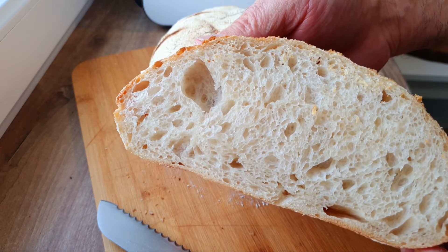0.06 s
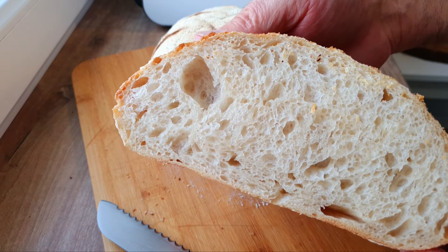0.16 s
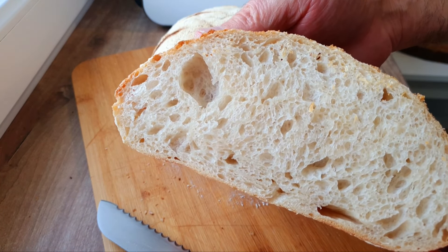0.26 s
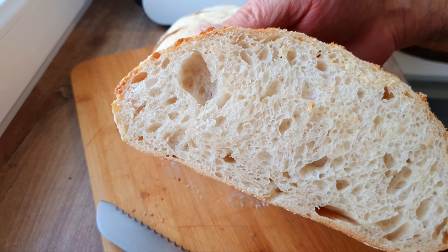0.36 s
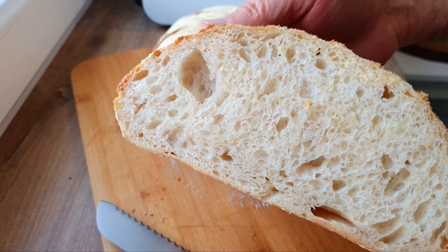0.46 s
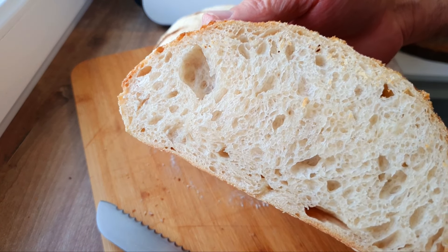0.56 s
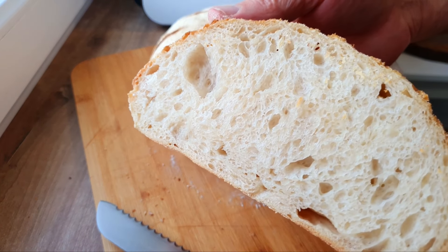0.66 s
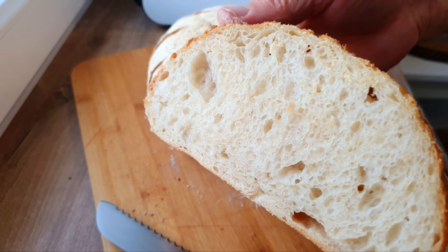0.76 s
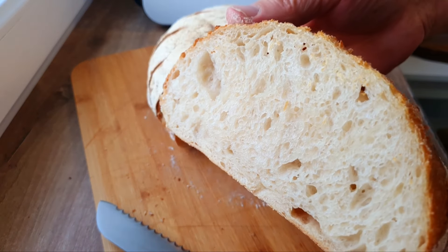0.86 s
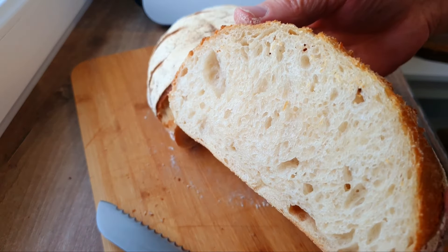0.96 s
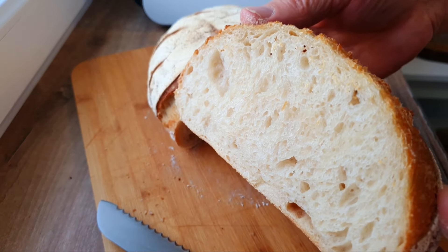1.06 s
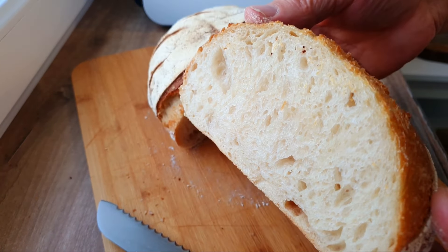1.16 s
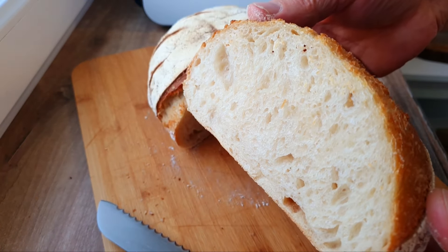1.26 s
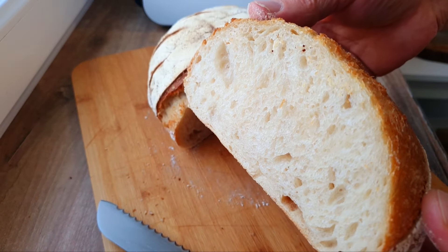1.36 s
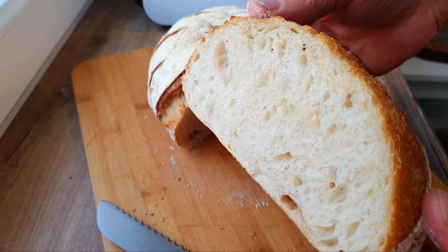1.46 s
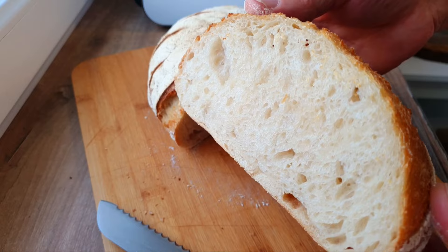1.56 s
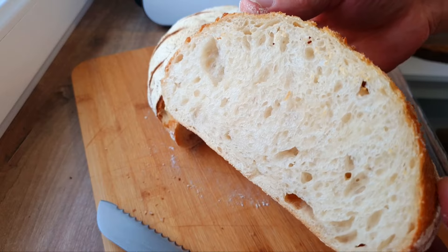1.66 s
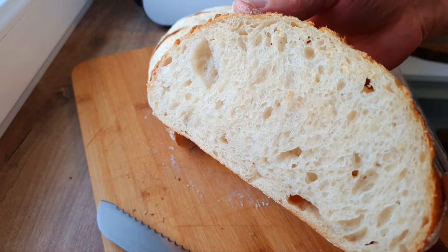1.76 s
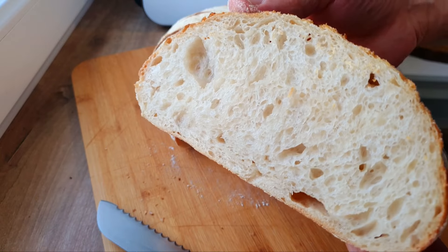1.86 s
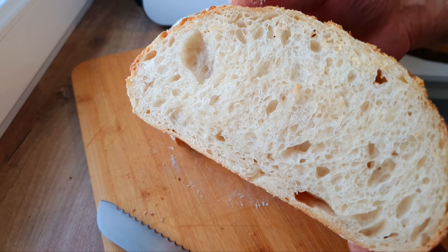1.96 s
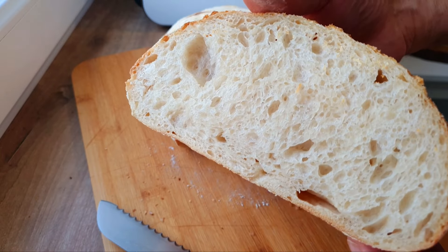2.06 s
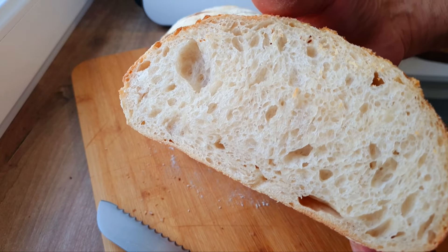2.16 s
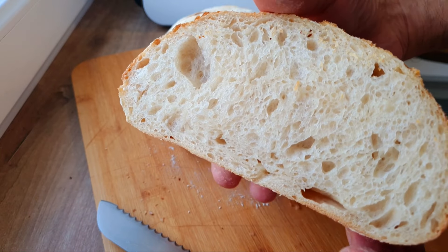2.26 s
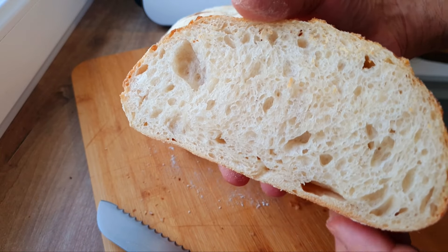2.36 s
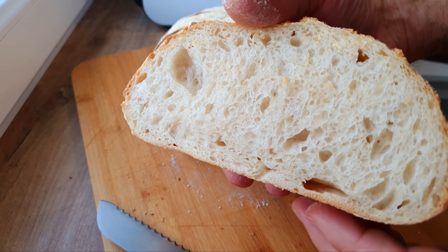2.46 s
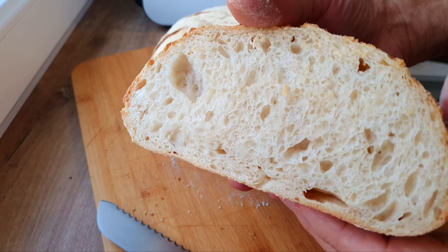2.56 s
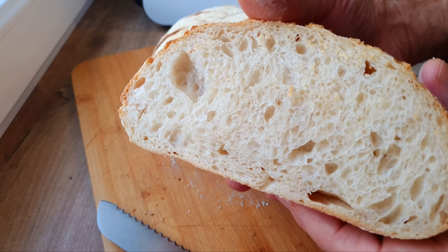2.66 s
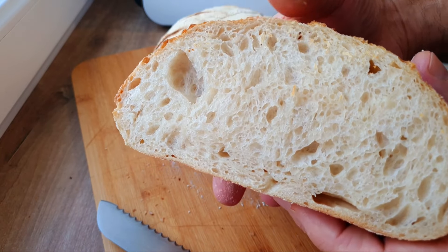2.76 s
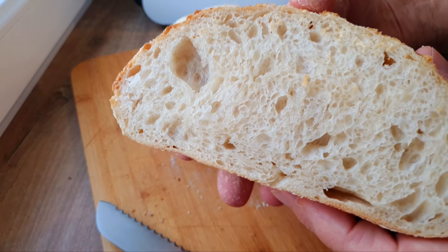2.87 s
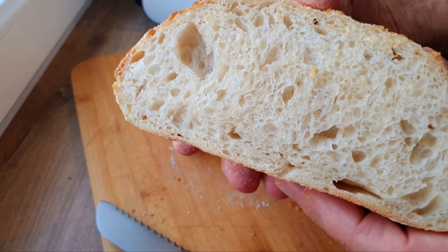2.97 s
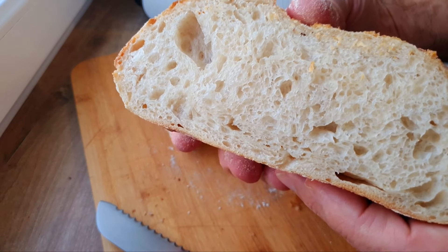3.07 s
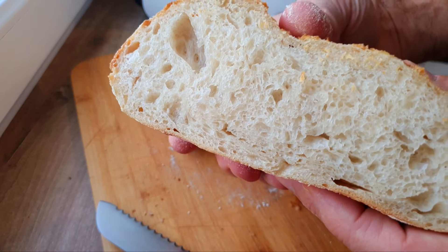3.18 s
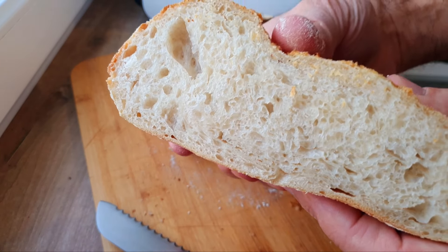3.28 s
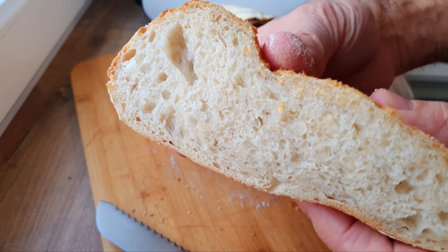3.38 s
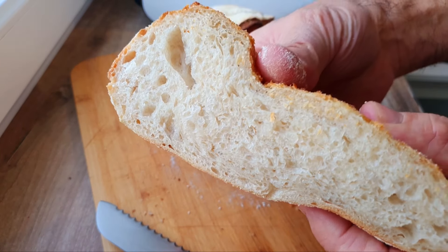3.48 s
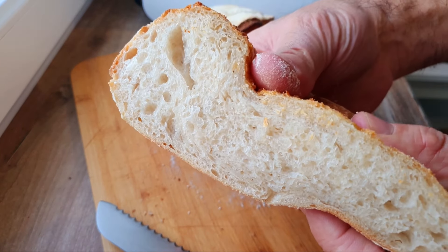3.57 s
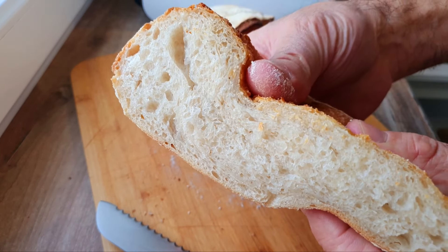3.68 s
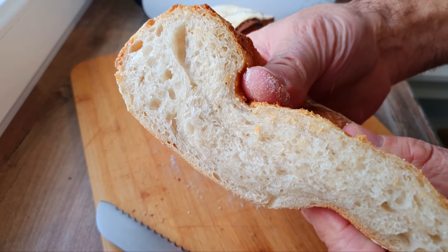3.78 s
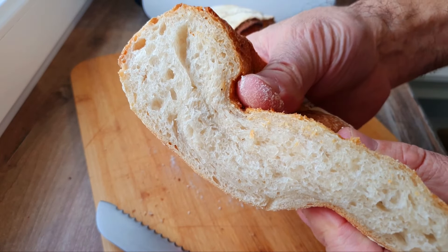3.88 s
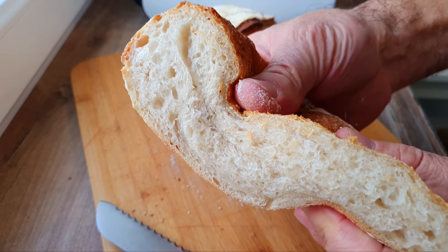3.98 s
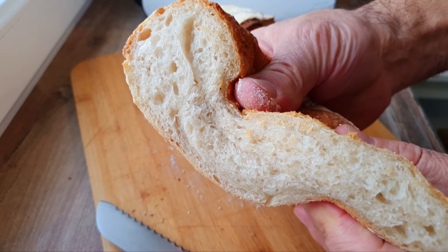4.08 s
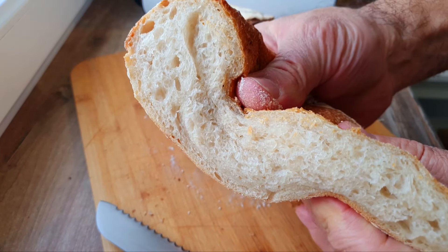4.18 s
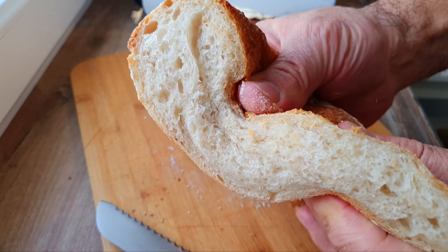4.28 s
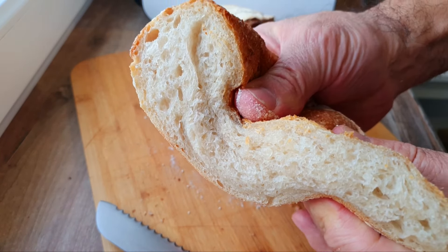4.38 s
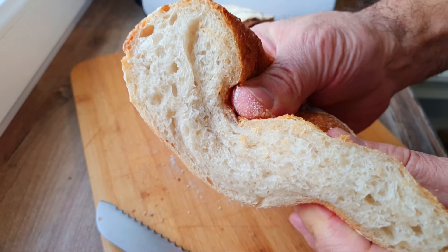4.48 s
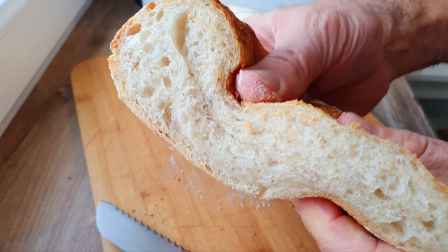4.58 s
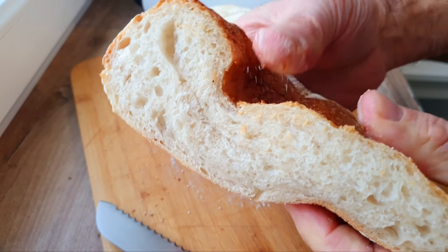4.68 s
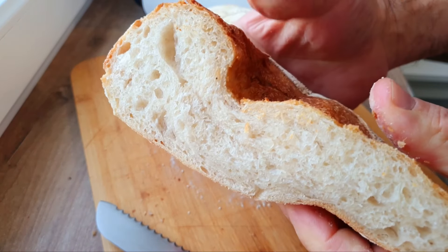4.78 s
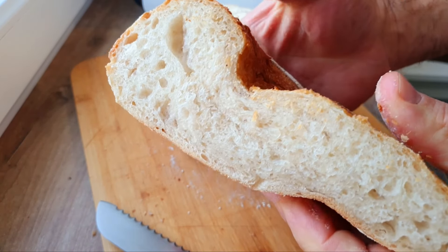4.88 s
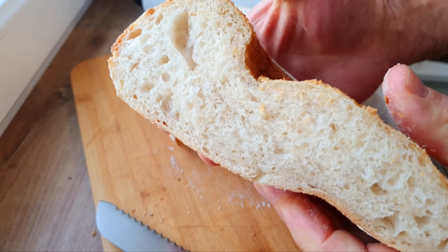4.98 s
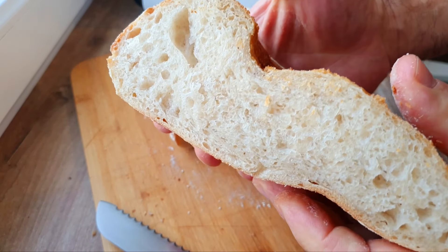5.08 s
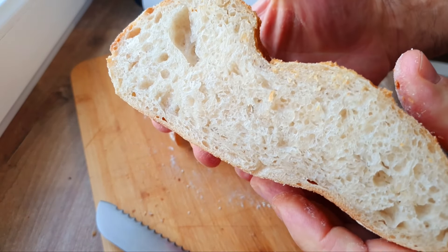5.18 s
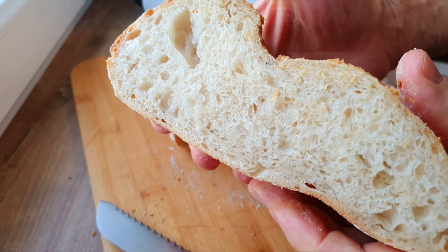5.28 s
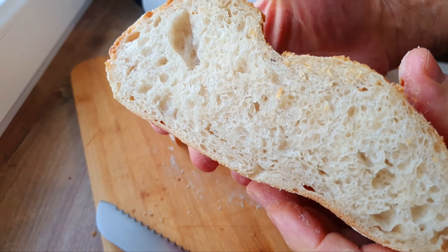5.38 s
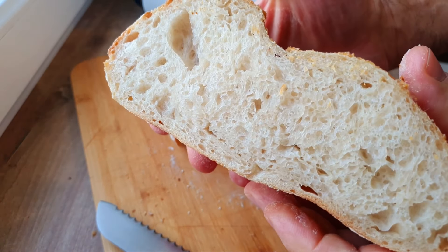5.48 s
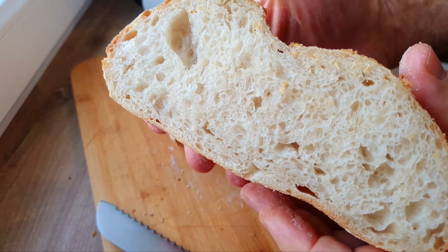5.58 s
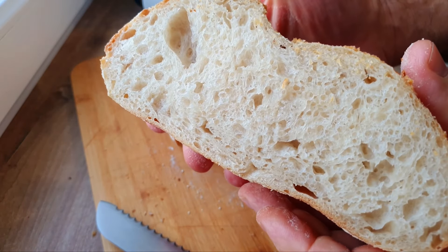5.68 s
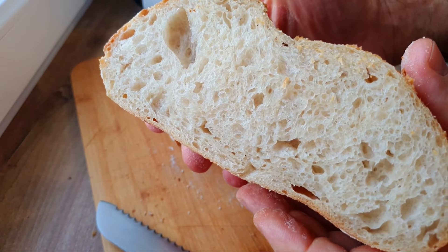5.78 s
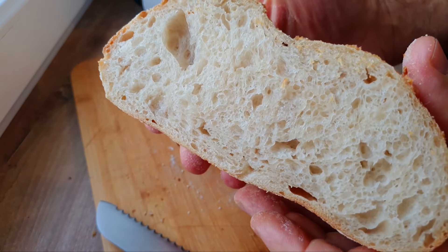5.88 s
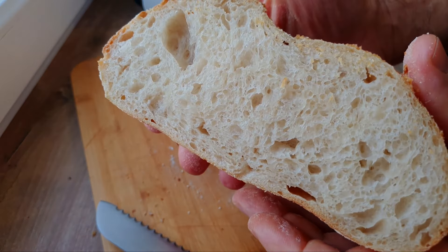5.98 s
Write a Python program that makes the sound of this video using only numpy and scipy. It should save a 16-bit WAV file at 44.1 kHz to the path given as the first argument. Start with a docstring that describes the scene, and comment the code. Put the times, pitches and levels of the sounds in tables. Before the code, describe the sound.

A small kitchen hums throughout: a deep, slightly throbbing appliance tone with faint wavering higher tones and a soft steady rush. Close to the microphone, a crusty loaf turns in the hands, almost silent apart from faint brushes at about 0.7 and 1.05 s. From 1.9 to 2.9 s fingers rub more distinctly, with dry gritty scrapes, short skin squeaks and a soft knock near 2.1 s; small cracks begin around 2.75 s. At 3.05 s the crust gives way with a sharp snap, and dense brittle crackling surges until about 4.5 s, packed with bright splintering pops, strongest around 3.05, 3.45 and 3.6 s, gradually thinning after 4.2 s. Near 4.65 s the thumb releases with a dull hollow knock and a scratchy slip. Light rubbing and scattered tiny ticks follow to about 5.1 s, then mostly hum with rare faint ticks and a last soft rustle by 6 s.

```python
"""An appliance hums and rushes in a small kitchen while fingers rub the floury crust of a cut loaf in the hands.
The loaf is bent until its crust breaks: surges of tiny fractures (shaped noise) and sharp cracks (noise bursts
with a ringing piece), a hollow knock (damped modes) as the thumb lets go, then ticks as the crust settles.
The hum is a sum of wavering tones, the rush coloured noise, the rubbing trains of bursts in skin and crust bands."""
import sys
import numpy as np
from scipy import signal
from scipy.fft import rfft, irfft, next_fast_len
from scipy.io import wavfile
from scipy.ndimage import map_coordinates

SR = 44100
rng = np.random.default_rng(int(sys.argv[2]) if len(sys.argv) > 2 else 0)


def unload_audio(sound):
    """Save the sound as a 16-bit wav file, at the path given as the first command line argument."""
    columns = np.transpose(np.atleast_2d(sound))
    # keep every value between -1 and 1, then stretch to whole-number steps
    steps = np.round(np.clip(columns, -1, 1) * 32767)
    wavfile.write(sys.argv[1], SR, steps.astype(np.int16))


N = 266083


def amp(db):
    """Logarithmic level: decibels to an amplitude gain."""
    return 10 ** (np.asarray(db) / 20)


def unit(x):
    """Power normalisation: x scaled to rms 1."""
    return x / np.sqrt(np.mean(x ** 2) + 1e-20)


def along(points, hz):
    """Logarithmic frequency scale: (f/Hz, value) points interpolated along it."""
    f, value = np.transpose(points)
    return np.interp(np.log(hz + 1), np.log(f + 1), value)


def wobble(rate):
    """Band-limited random fluctuation: a smooth curve through `rate` random knots a second."""
    position = np.arange(N) * rate / SR
    fine = np.arange(0, position[-1] + 1, .125)
    knots = rng.standard_normal(int(position[-1]) + 4)
    return np.interp(position, fine, map_coordinates(knots, [fine]))


def sides(balance_db):
    """Level-difference stereo: left and right gains of mean power 1."""
    return unit(amp([[balance_db / 2], [-balance_db / 2]]))


def filtered(x, response):
    """Linear filtering: the spectrum of x times a response of frequency."""
    n = x.shape[-1]
    padded = next_fast_len(n + n // 8)
    spectrum = rfft(x, padded) * response(np.fft.rfftfreq(padded, 1 / SR))
    return irfft(spectrum, padded)[..., :n]


def coloured(x, spectrum):
    """Spectral shaping: x filtered by (f/Hz, dB) points and brought to rms 1."""
    return unit(filtered(x, lambda hz: amp(along(spectrum, hz))))


def add(track, s, sound):
    """Superposition: a sound is mixed into the track from time s."""
    part = track[:, max(round(s * SR), 0):][:, :sound.shape[-1]]
    part += sound[..., :part.shape[-1]]


def held(s, length, attack, release, fade_db=0):
    """Exponential growth and decay: reaches 1 at time s, fades by fade_db while held, then dies away."""
    t = np.arange(N) / SR - s
    edges = np.exp(np.minimum(t, 0) / attack - np.maximum(t - length, 0) / release)
    return edges * amp(-fade_db * np.clip(t / length, 0, 1))


def decaying_power(power, life):
    """Exponential relaxation: the amplitude of kicks of power that each die away over `life` seconds."""
    return np.sqrt(signal.lfilter([1], [1, -np.exp(-2 / (life * SR))], power))


def fractures(rate, spread_db, life):
    """Shot noise: a stereo train of `rate` tiny bursts a second at random times, many small, a few large."""
    size = amp(spread_db * np.minimum(rng.exponential(size=N), np.pi))
    size = size * (rng.random(N) < rate / SR)
    return unit(decaying_power(size ** 2, life) * rng.standard_normal((2, N)))


# air noise of appliance and room: f/Hz, relative level/dB per Hz
AIR = [(20, -14), (55, 9.5), (150, 5.5), (230, -1), (400, 0), (650, 1.8), (1100, -0.9), (1450, -8),
       (2400, -12), (3550, -9), (4400, -17.5), (7600, -19.5), (9000, -31), (15500, -21.5)]
# likeness of left and right, from 0 (unrelated) to 1 (identical): f/Hz, likeness
ALIKE = [(40, 0.38), (130, 1), (260, 0.26), (600, 0), (2000, 0)]


def air(level_db=-56.0):
    """Partial coherence of diffuse noise: a steady rush, alike in both channels only in part of the bass."""
    def turn(hz):
        return np.arccos(np.clip(along(ALIKE, hz), -1, 1)) / 2

    def mid_side_gains(hz):
        return np.array([np.cos(turn(hz)), np.sin(turn(hz))])

    mid, side = filtered(rng.standard_normal((2, N)), mid_side_gains)
    return amp(level_db + 0.24 * wobble(4.37)) * coloured(np.array([mid + side, mid - side]), AIR)


def drone(level_db=-61, centre_hz=156, width_hz=11):
    """Narrow-band noise: a resonance of the running appliance swells and dips irregularly."""
    band = filtered(rng.standard_normal(N), lambda hz: 1 / (1 + (2 * (hz - centre_hz) / width_hz) ** 4))
    return amp(level_db) * sides(0.93) * unit(band)


# the appliance's steady tones in the room's standing waves:
# f/Hz, rms level/dB, left-right difference/dB, left's phase lead/rad
HUM = [(60.1, -52.5, 0, -.2), (120.2, -65, 1, 0), (240.5, -75, 2, .2), (270.7, -70, 8, -.6),
       (360.8, -61.5, -15, -2.3), (480.9, -73, -6, 3), (541.2, -75, 0, -.4), (781.8, -70, -2, -1.9),
       (800, -68.5, -10, -1.7), (1022, -70, 2, -2.6), (1082, -74, -4, 2.8), (1203, -68.5, 2, 3),
       (1623, -79, -1, -2.3), (3067, -81, -5, -.5), (3246, -84, 0, 0), (3548, -78, 3, 2.7),
       (3607, -78, 8, -2), (3790, -86, 0, 0)]


def hum(waver_db=4.0, drift=0.11, steady_hz=130):
    """Harmonic excitation: a compressor's bass tones keep in step with its strokes, higher ones waver."""
    t, out = np.arange(N) / SR, np.zeros((2, N))
    for hz, db, balance_db, lead in HUM:
        loose = np.clip((hz - steady_hz) / 400, 0, 1)
        start = (hz > steady_hz) * rng.random()  # cycles
        phase = 2 * np.pi * (hz * t + start) + drift * np.sqrt(hz / 60) * wobble(4.52)
        tone = -np.sqrt(2) * np.cos([phase + lead / 2, phase - lead / 2])
        out += amp(db + waver_db * loose * wobble(9)) * sides(balance_db) * tone
    return out


def shaking(level_db=-51.5, ebb_db_per_s=1.8):
    """Beating: an ebbing tone midway between the hum's first two harmonics makes the hum throb."""
    t = np.arange(N) / SR
    cycles = 3 / 2 * HUM[0][0] * t
    sway_db = .7 * wobble(2.5)
    return amp(level_db - ebb_db_per_s * t + sway_db) * -np.sqrt(2) * np.cos(2 * np.pi * cycles)


# faint rustle of the loaf lying in the hands: t/s, nominal level/dB
HOLDING = [(0, -79), (.8, -66.5), (1.65, -87), (2.15, -62), (4.7, -60), (5.0, -55.5), (5.3, -60),
           (6.03, -65)]
# strokes of the fingers over the crust: t/s, length/s, nominal rasp level/dB, skin re rasp/dB
RUBS = [(0.737, 0.12, -61.5, -3), (1.046, 0.023, -68.5, 7), (1.871, 0.024, -61, 0),
        (2.065, 0.042, -48, -4.5), (2.332, 0.012, -49, -2.5), (2.393, 0.028, -51.5, -8),
        (2.573, 0.023, -57, -22), (2.675, 0.095, -48.5, -9.5), (2.961, 0.17, -53, 0.5),
        (4.486, 0.28, -55, -5), (4.75, 0.008, -64, -20), (4.81, .015, -59, -17), (4.87, 0.086, -50, -14),
        (5.687, 0.025, -69, 3)]
RUB_ATTACK_S, RUB_RELEASE_S = 0.013, 0.038
# spectrum of rough crust: f/Hz, relative level/dB
RASP = [(300, 5), (1500, -15), (2600, -8.5), (4500, -0.5), (7500, 3), (9000, -7.5), (12000, -3.5),
        (15500, -2)]
# spectrum of dragging skin: f/Hz, relative level/dB
SKIN = [(150, 1), (400, 4), (1100, 5), (1650, 2), (2200, 2), (3500, 2), (8000, -10.5)]


def fingers(rasp_db=-5.0, skin_db=-2, holding_skin_db=1, catch_db=-8, grip_db=-54):
    """Dry friction: skin drags over flour and rough crust in strokes and a faint rustle, catching on crumbs."""
    holding = amp(np.interp(np.arange(N) / SR, *np.transpose(HOLDING)) + 0.89 * wobble(7.3))
    rasp, skin = holding, amp(holding_skin_db) * holding
    for s, length, db, soft_db in RUBS:
        stroke = amp(db) * held(s, length, RUB_ATTACK_S, RUB_RELEASE_S)
        rasp, skin = np.hypot(rasp, stroke), np.hypot(skin, amp(soft_db) * stroke)
    grit = fractures(rate=2500, spread_db=3.5, life=.0006)
    catches = fractures(rate=140, spread_db=3, life=.0007)
    drag = fractures(rate=3200, spread_db=0.0, life=0.0016)
    grip = rasp / (rasp + amp(grip_db))  # a light touch glides with little catching
    rough = amp(rasp_db) * coloured(grit, RASP) + amp(catch_db) * grip * coloured(catches, RASP)
    soft = amp(skin_db) * skin * coloured(drag, SKIN)
    judder = unit(amp(2.6 * wobble(170)))
    return sides(-0.79) * judder * (rasp * rough + soft)


# skin slipping on the crust, each slip with its own pitch: t/s, level/dB, f/Hz, half length/s
SLIPS = [(0.653, -63, 2450, 0.011), (1.059, -64.5, 1590, 0.012), (1.993, -59, 1460, 0.016),
         (2.084, -47.5, 1670, 0.015), (2.07, -57, 2300, 0.013), (2.135, -58, 1600, .018),
         (2.697, -53.5, 4600, 0.014), (2.695, -57.5, 3700, 0.016), (2.764, -52.5, 2850, 0.011),
         (2.985, -56.5, 2450, .008), (3.042, -50, 1650, .005), (4.599, -48, 4170, 0.018),
         (4.66, -50, 3250, 0.025)]


def slips(width=0.21):
    """Stick-slip: a fingertip briefly sounds one resonance of the crust, of the given relative width."""
    out, t = np.zeros((2, N)), np.arange(-SR // 16, SR // 16) / SR
    for s, db, centre, half in SLIPS:
        noise = rng.standard_normal((2, len(t)))
        ring = filtered(noise, lambda hz: 1 / (1 + ((hz / centre - 1) * 2 / width) ** 2))
        judder = amp(4 * wobble(220)[:len(t)])
        add(out, s + t[0], amp(db) * np.exp(-(t / half) ** 2 / 2) * unit(judder * ring))
    return out


# soft knocks of the hands on the loaf: t/s, nominal level/dB
KNOCKS = [(2.075, -49), (3.044, -53), (3.457, -52), (3.591, -44.5), (4.635, -42.5), (4.651, -42),
          (4.663, -39.5)]
# the loaf's hollow ring: f/Hz, relative level/dB, t60/s
LOAF = [(294, 3.5, 0.094), (377, 3.5, 0.074), (497, 2.5, 0.046), (850, -2, 0.072), (1100, 8, 0.039),
        (1350, 7, 0.031), (1520, 1, 0.04), (1730, -2, 0.06)]
# the dull push of the soft crumb: f/Hz, relative level/dB per Hz
CRUMB = [(120, -24), (280, -4), (450, -5), (800, 15), (1300, -14), (2500, -41)]


def knocks(attack=0.00058, crumb_t60=0.046, ring_db=-3):
    """Damped modes: the crumb gives a dull thud and the loaf's hollow shell rings briefly."""
    out, t = np.zeros((2, N)), np.arange(SR // 4) / SR
    for s, level_db in KNOCKS:
        ring = np.zeros((2, len(t)))
        for hz, db, t60 in LOAF:
            ring += amp(db - 60 * t / t60) * np.sin(2 * np.pi * (hz * t + rng.random((2, 1))))
        thud = amp(-60 * t / crumb_t60) * coloured(rng.standard_normal((2, len(t))), CRUMB)
        add(out, s, amp(level_db) * (1 - np.exp(-t / attack)) * (amp(ring_db) * ring + thud))
    return out


# stretches in which the crust gives way, long under the thumb's two steady pushes, short in surges:
# t/s, rise/s, length/s, nominal level/dB, fade over the length/dB, flexing re level/dB
SURGES = [(3.054, .002, 1.014, -42, 1, -7.5), (3.047, 0.0055, 0.08, -30, 5.5, -6.5),
          (3.149, .002, 0.024, -35.5, 0, -5), (3.188, 0.0046, 0.097, -33, -1.5, -6),
          (3.312, 0.0089, 0.082, -34, 5.5, -2), (3.444, 0.013, 0.087, -33.5, 2, -5.5),
          (3.585, .012, 0.06, -37, -2, -19), (3.725, .01, 0.081, -44.5, 3, -5.5),
          (3.802, .002, 0.052, -31.5, 1.5, -6), (3.875, .003, .075, -33.5, 1.5, -5.5),
          (3.993, 0.0094, 0.081, -36, -2, -7), (4.08, .002, 0.061, -43, 0, -16),
          (4.124, .004, 0.33, -41.5, 1, -10.5), (4.166, .002, 0.065, -34, -3.5, -10.5),
          (4.278, .006, 0.16, -37, 2.5, -8.5), (4.499, .009, 0.047, -41, 0.5, -11),
          (4.594, 0.018, 0.04, -42, 1, -1), (4.642, .01, 0.034, -40, 11, 4)]
SURGE_RELEASE_S = 0.0073


def bending():
    """Incoherent power addition: levels of fine crackle and flexing shell, summed over the surges."""
    fine, flex = 0, 0
    for s, rise, length, db, fade_db, flex_db in SURGES:
        surge = amp(db) * held(s, length, rise, SURGE_RELEASE_S, fade_db)
        fine = fine + surge ** 2
        flex = flex + (amp(flex_db) * surge) ** 2
    return np.sqrt(fine), np.sqrt(flex)


def chips(centre_hz=5400, octaves=0.63, ring_cycles=13, count=2000, size=400):
    """Impulse response of small flakes: each a sharp tick and brief ring of its own pitch, strength and side."""
    out, t = np.zeros((2, N)), np.arange(size) / SR
    when, strength, pitch, side = rng.random((4, count))
    flake_hz = centre_hz * 2 ** (octaves * (2 * pitch - 1))
    cycles = flake_hz[:, None, None] * t
    ring = np.sin(2 * np.pi * (cycles + rng.random((count, 2, 1)))) * amp(-60 * cycles / ring_cycles)
    tick = rng.standard_normal((count, 2, size)) * np.exp(-t / .00035)
    gain = amp(13 * strength[:, None] ** 2 + np.outer(side - .5, [8, -8]))
    for s, pop in zip(when * N / SR, gain[..., None] * (ring + tick)):
        add(out, s, pop)
    return unit(out)


# the clearest cracks of the crust: t/s, nominal level/dB, low band re middle/dB, high band re middle/dB,
# left-right difference/dB, pitch of the piece f/Hz
CRACKS = [(2.759, -38, -4.5, -5, -14, 2790), (2.9243, -40.5, 1, -7, -5, 895), (2.974, -42, -4, 1, -8, 1010),
          (3.0068, -38.5, -16, -17, -9, 4370), (3.048, -16, -4.5, -9, 1, 3550),
          (3.056, -23, 1, -5, 1, 3770), (3.0715, -26, -19, -9, 3, 3000), (3.084, -24.5, 2, -16, 1, 2020),
          (3.103, -30, -10, -9, -2, 2820), (3.152, -32, -11, 1, -9, 3100), (3.161, -23, -19, -4, -6, 1970),
          (3.193, -19, -10.5, -10, -7, 3170), (3.2077, -28, -19, -7, -9, 6200),
          (3.21, -29, -10, -8, -8, 3160), (3.2233, -23.5, 3, -16, -5, 980),
          (3.2633, -25, -10, -12, -1, 2080), (3.2723, -29, -7, -10, -8, 4100),
          (3.315, -25, 19, -4, -16, 1050), (3.3326, -32, -7, 10, -6, 4600),
          (3.3791, -21, -15, 4.5, -4.5, 1740), (3.4118, -30, -10, 8, -7, 6800),
          (3.4178, -24.5, -13, 8, -1, 4770), (3.4422, -27, -6, -8, 0, 2850),
          (3.456, -13, -4, 3.5, -5.5, 1174), (3.4824, -25, 13, -4, 4, 1680),
          (3.5047, -32, -10, -4, -1, 7100), (3.52, -17.5, -5.5, 2, -2, 3230),
          (3.5634, -22, -17, 8, -1, 4570), (3.5782, -24, -11, 6, -7, 7500),
          (3.5903, -15, -8, -0.5, -6, 5040), (3.631, -23, -22, 4, -9, 4360),
          (3.6383, -22, -25, 3, -2, 4900), (3.6523, -26.5, -7, -6, 2, 4500),
          (3.6555, -23, -11, -5, -2, 2450), (3.692, -25.5, -7, 10, -4, 2420),
          (3.7226, -35, -7, 3, -3, 7200), (3.7474, -30, -15, 11, -4, 1930), (3.7577, -20, -38, 4, -8, 5000),
          (3.789, -27, -5, 5, 3, 1700), (3.8037, -17.5, 4, 1, 0, 1580), (3.823, -26, -23, 3, 4, 4200),
          (3.8358, -21.5, -7, -12, -5, 2930), (3.87, -20, -4, -7, 2, 1550), (3.8958, -28, -2, -7, 5, 2880),
          (3.91, -21.5, -16, -4, -3, 4700), (3.919, -28, -11, 0, -11, 6200), (3.9233, -31, -15, 1, 6, 6800),
          (3.9581, -24.5, -4, -6, -3.5, 1510), (3.986, -30, -11, -2, -7, 6500),
          (3.9993, -25.5, -19, -1, -12, 5000), (4.004, -26.5, -20, -7, 7, 7460),
          (4.007, -25, -9, -7, -3, 1420), (4.0338, -25.5, -13, 5, -1, 5200), (4.0456, -22, -4, 0, 2, 2930),
          (4.0708, -32, -16, 6, 0, 5200), (4.096, -33, -16, 18, -2, 4440), (4.1037, -38, -14, 11, -4, 6600),
          (4.13, -28.5, -20, -4, -8, 3840), (4.1476, -25, -7, -4, -8, 3740),
          (4.1587, -28, -7, 6, -11, 3550), (4.168, -18, 0, 9, 0, 2930), (4.1724, -24.5, 2, -2, 0, 1550),
          (4.2154, -26.5, 5, 7, 0, 4300), (4.2284, -21.5, -12, -2, -2, 3780),
          (4.2885, -21.5, -7, 1, -1.5, 1400), (4.315, -21.5, 4, -25, -5, 2630),
          (4.326, -27.5, 2, -13, -1, 2200), (4.3482, -29, -5, -14, -6, 1500),
          (4.357, -32, -16, -7, 6, 2870), (4.38, -24, 0, -3, 2, 2950), (4.4114, -25, -16, 0, 0, 2720),
          (4.4417, -26.5, 1, 2, -1.5, 2870), (4.4735, -44, -12, 8, -2, 6500),
          (4.4929, -40, -11, 1, -2, 2820), (4.503, -24.5, -26, -4, 3.5, 6640),
          (4.517, -30.5, -13, -2, -8, 6500), (4.5401, -34.5, -15, -12, 7, 5300),
          (4.6154, -33, -17, -8, 2, 3780), (4.6527, -23.5, 4, -2, 4, 1370),
          (4.664, -22.5, 30, -9, -1, 1400), (4.6854, -33, -16, -6, -3, 3100),
          (4.766, -39, -25, -1, -15, 4400), (4.772, -37.5, -16, 11, 2, 5000),
          (4.8056, -37, -12, 16, -2, 1220), (4.8198, -44, -7, 3, 1, 3700),
          (4.8766, -42.5, -7, -16, -2, 3600), (4.8822, -41.5, 0, -4, -6, 3420),
          (4.89, -36.5, -8, 17, -2, 1050), (4.9276, -38, -13, -7, -2, 4440),
          (4.957, -44, -12, -6, -1, 3500), (5.055, -43, 4, 29, -8, 4000), (5.554, -48, -14, 9, -3, 4000),
          (5.715, -44.5, -15, 0, 1, 4060), (5.951, -52, -10, -22, -5, 3000)]


def showers(life=0.0031, shower_db=-17):
    """Aftershock decay: level of the small fractures that follow every crack."""
    kicks = np.zeros((1, N))
    for s, db, *_ in CRACKS:
        add(kicks, s, amp([db + shower_db]) ** 2)
    return decaying_power(kicks[0], life)


# low range of the crust, the flexing shell: f/Hz, relative level/dB per Hz
FLEX = [(100, -43), (280, -8.5), (550, -16), (800, -4), (1200, -2.5), (1750, 0), (2100, -8.5), (2600, -4.5),
        (3400, -14.5)]
# middle range, the snapping crust: f/Hz, relative level/dB per Hz
SNAP = [(1400, -64), (2100, -9), (2600, -3), (4000, -1.5), (7500, 0), (8400, -8), (10000, -24)]
# high range, the finest fractures: f/Hz, relative level/dB per Hz
FIZZ = [(6500, -19), (8300, -6.5), (9800, -1.5), (12000, 0), (15000, 6), (16000, -11)]


def crackle(snap_db=-4.0, fizz_db=-6.0, flex_db=-3.6, shower_flex_db=-10):
    """Crackling noise: bent crust crumbles in clumps of tiny fractures, and longer bursts flex the shell."""
    fine, flex = bending()
    shower = showers()
    clumps = amp(1.3 * wobble(90))
    grains = clumps * fractures(rate=2000, spread_db=3.8, life=.0006)
    pops = 1.5 * chips()
    dust = clumps * fractures(rate=1300, spread_db=4.5, life=.0004)
    flakes = fractures(rate=1000, spread_db=4.3, life=.0014)
    brittle = amp(1.1 * wobble(25))  # dry patches splinter more brightly
    snap = amp(snap_db) * coloured(grains + pops, SNAP)
    fizz = amp(fizz_db) * brittle * coloured(grains + dust, FIZZ)
    flexing = np.hypot(flex, amp(shower_flex_db) * shower)
    dull = amp(flex_db) * flexing * coloured(flakes, FLEX)
    return sides(-0.98) * np.hypot(fine, shower) * (snap + fizz) + dull


def cracks(scatter_fall=0.0084, level_db=0.2, ring_db=-7.0, ring_cycles=24,
           overtone=2.15, overtone_db=-7, ring_cut_hz=750):
    """Brittle fracture: a crack gathers speed, runs about 1 ms, rings its piece, scatters off hands and board."""
    out = np.zeros((2, N))
    t = np.arange(-SR // 200, SR // 30) / SR
    swell = np.exp(np.minimum(t, 0) / .00025)
    after = np.maximum(t, 0)
    snap = np.exp(-np.maximum(after - .0006, 0) / .0008)
    scatter = amp(-13) * np.exp(-after / scatter_fall)
    shape = swell * np.hypot(snap, scatter)
    duty = np.sqrt(.0015 * SR / len(t))  # refers the level to 1.5 ms of sound
    for s, db, low_db, high_db, balance_db, hz in CRACKS:
        burst = shape * rng.standard_normal((2, len(t)))
        weights = amp([low_db, 0, high_db])
        sound = sum(w * coloured(burst, band) for w, band in zip(weights, (FLEX, SNAP, FIZZ)))
        # the piece rings for a number of cycles, so low-pitched ones last longer
        cycles = hz * after * np.array([[1], [overtone]])
        phase = 2 * np.pi * (cycles + rng.random((2, 2, 1)) / 2)
        modes = np.sin(phase) * swell * amp(-60 * cycles / ring_cycles)
        # the ring is thin, with little sound below about 750 Hz
        ring = filtered(amp([0, overtone_db]) @ modes, lambda f: f ** 4 / (f ** 4 + ring_cut_hz ** 4))
        sound += amp(ring_db) * np.hypot(*weights[:2]) * unit(ring)
        add(out, s + t[0], amp(db + level_db) * duty * sides(balance_db) * unit(sound))
    return out


# fixed resonances of the crust shell: f/Hz, width/Hz, level over the direct sound/dB
SHELL = [(1240, 90, -6), (1733, 60, -3), (1983, 30, -7), (2620, 90, -5), (2869, 40, -7), (3468, 50, -6),
         (4661, 60, -6), (5458, 70, -8), (6262, 80, -9), (7550, 110, -9)]


def shell(x):
    """Forced resonance: the sounds of breaking and rubbing also ring the whole crust."""
    def response(f):
        return 1 + sum(amp(db) * 1j * f * w / (c * c - f * f + 1j * f * w) for c, w, db in SHELL)

    return filtered(x, response)


# reverberation of the kitchen: f/Hz, t60/s
ROOM = [(200, 0.18), (1500, 0.11), (6000, 0.23), (15000, 0.15)]


def room(x):
    """Reverberation: convolution with a short decaying noise tail whose decay time varies with frequency."""
    hz, t, z = signal.stft(rng.standard_normal((2, SR // 2)), SR, nperseg=256)
    decay = amp(-60 * t / along(ROOM, hz)[:, None])
    tail = signal.istft(z * decay, SR, nperseg=256)[1]
    tail = np.pad(tail / np.linalg.norm(tail[0]), ((0, 0), (SR // 300, 0)))  # arrives after 1/300 s
    return signal.fftconvolve(x, tail, axes=1)[:, :N]


def scene():
    """Direct and reverberant sound: the loaf close by, in the humming kitchen."""
    bread = shell(cracks() + crackle() + fingers()) + slips() + knocks()
    return bread + amp(-5.5) * room(bread) + hum() + shaking() + drone() + air()


TOP_HZ = 15850


def record(dry):
    """Band limitation: nothing above TOP_HZ is kept."""
    return filtered(dry, lambda hz: hz < TOP_HZ)


dry = scene()
out = record(dry)
unload_audio(out)
```